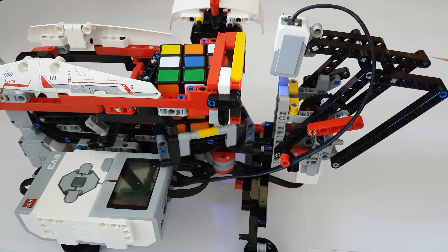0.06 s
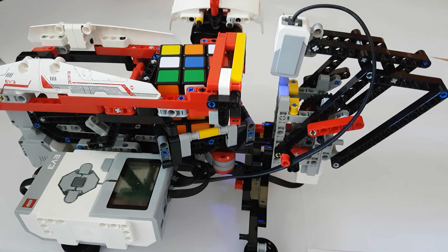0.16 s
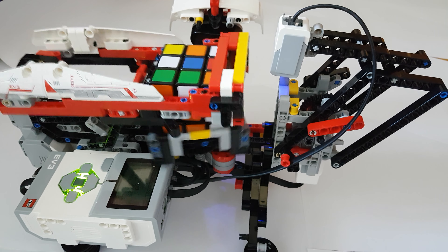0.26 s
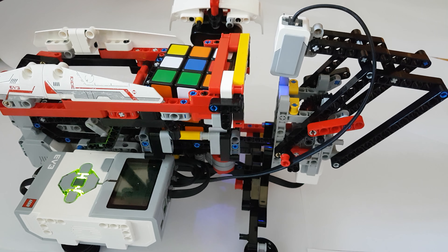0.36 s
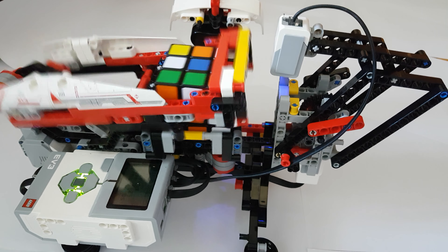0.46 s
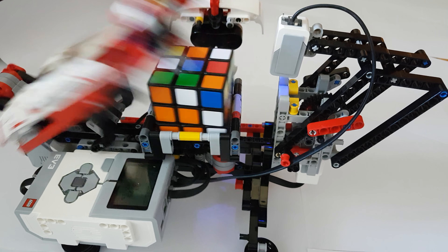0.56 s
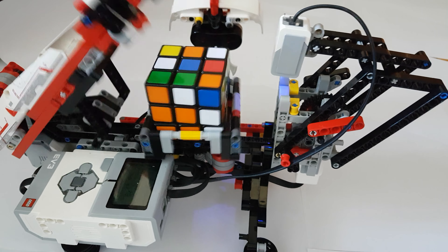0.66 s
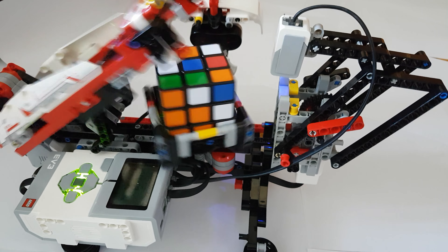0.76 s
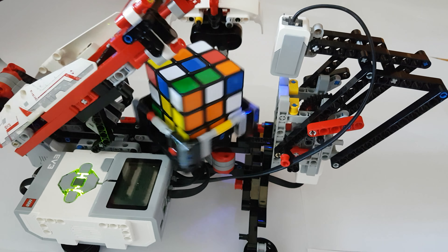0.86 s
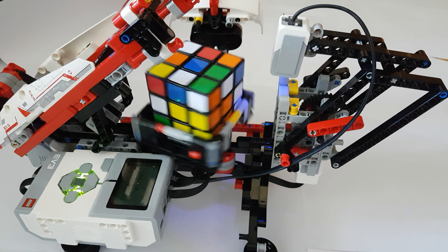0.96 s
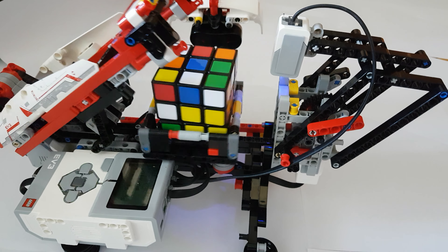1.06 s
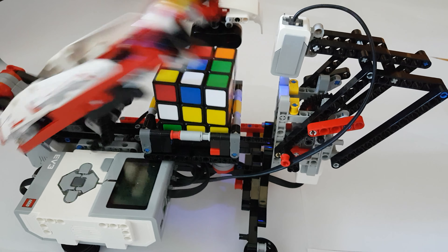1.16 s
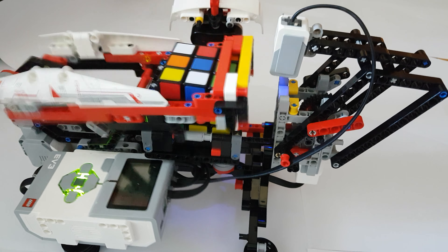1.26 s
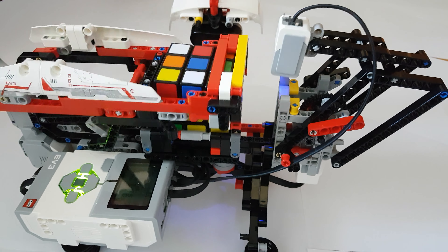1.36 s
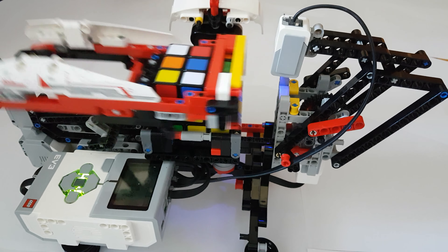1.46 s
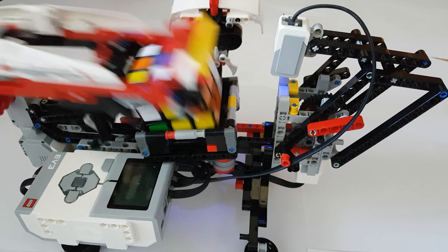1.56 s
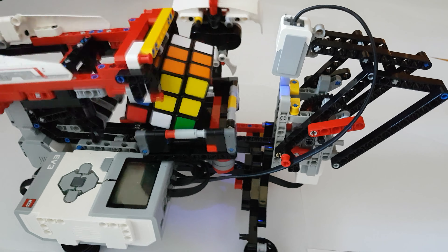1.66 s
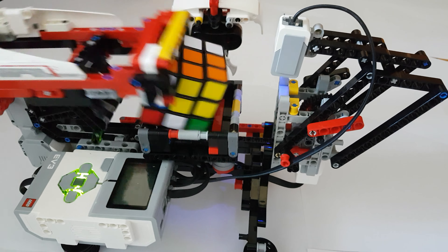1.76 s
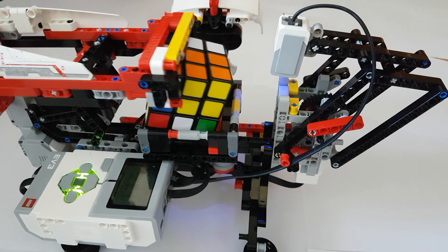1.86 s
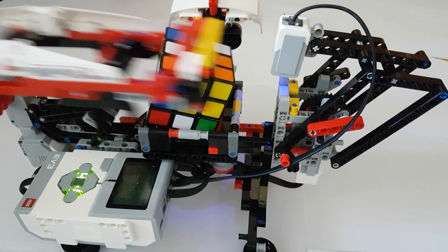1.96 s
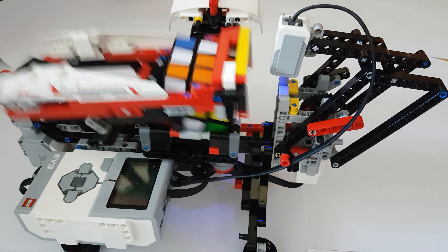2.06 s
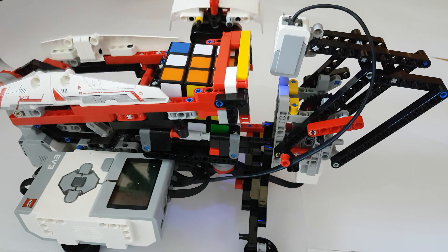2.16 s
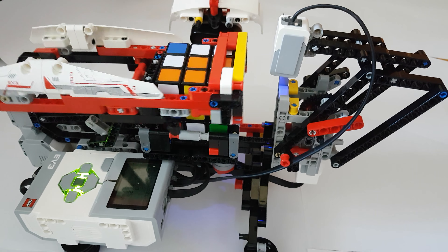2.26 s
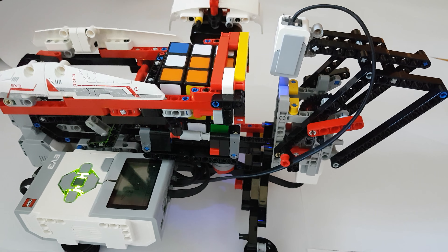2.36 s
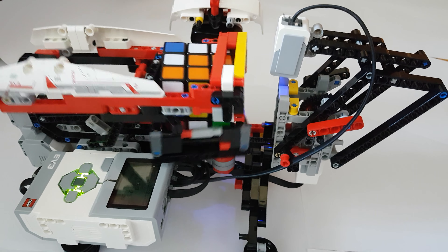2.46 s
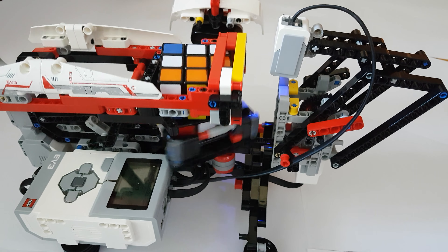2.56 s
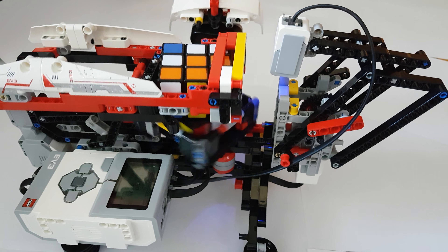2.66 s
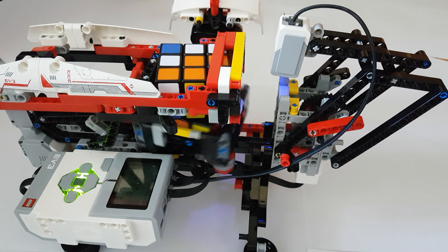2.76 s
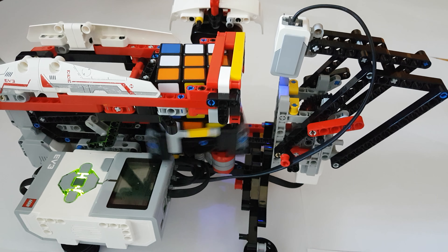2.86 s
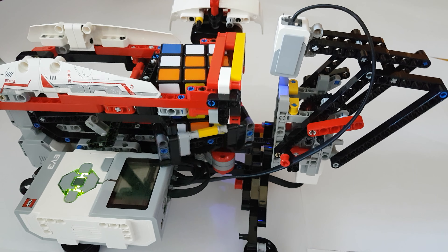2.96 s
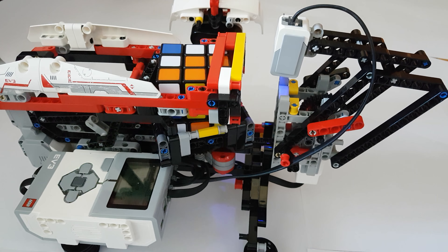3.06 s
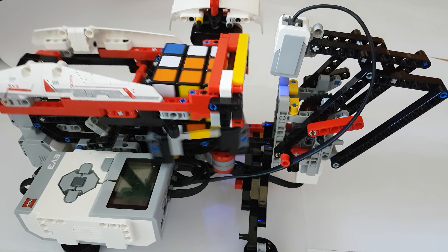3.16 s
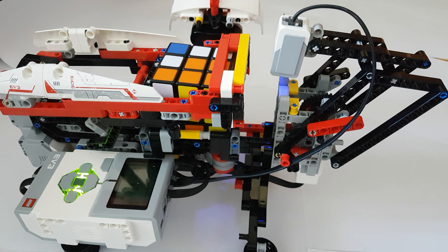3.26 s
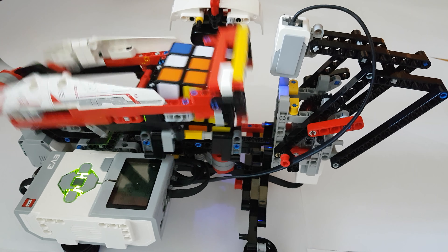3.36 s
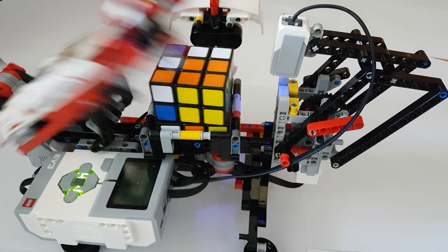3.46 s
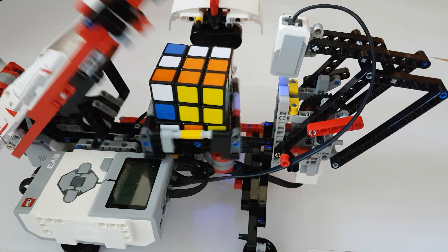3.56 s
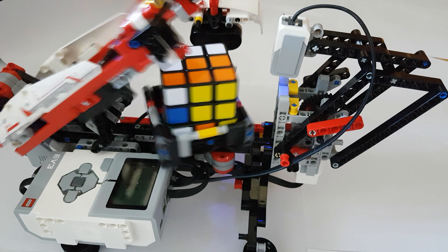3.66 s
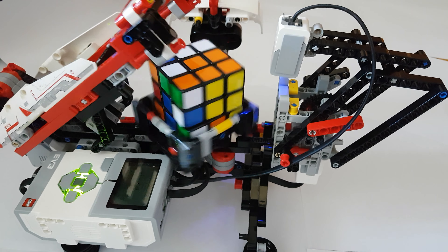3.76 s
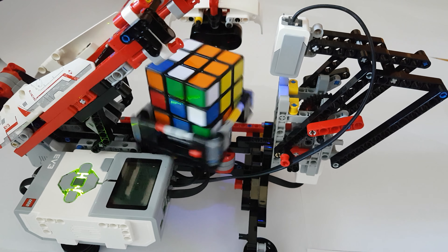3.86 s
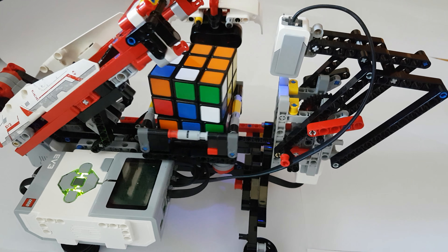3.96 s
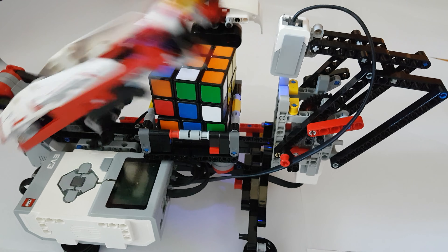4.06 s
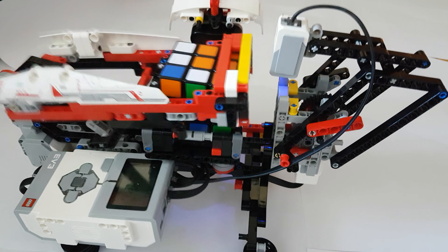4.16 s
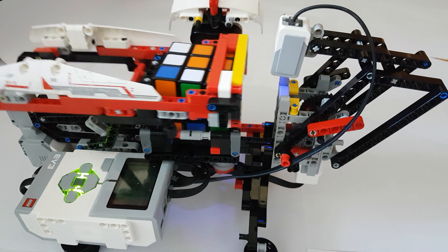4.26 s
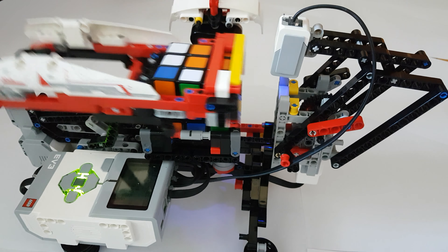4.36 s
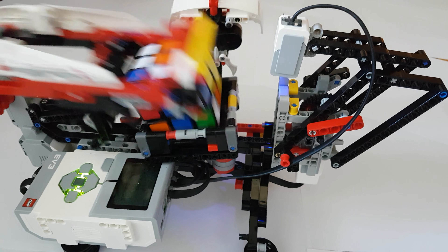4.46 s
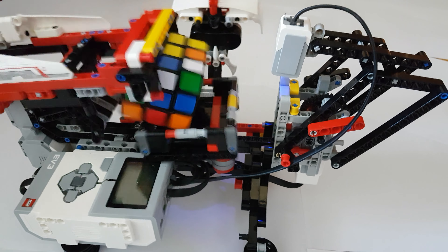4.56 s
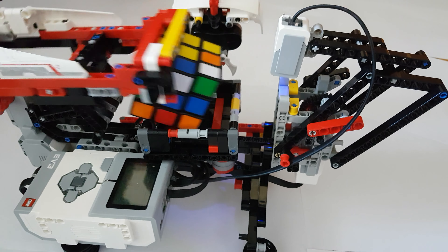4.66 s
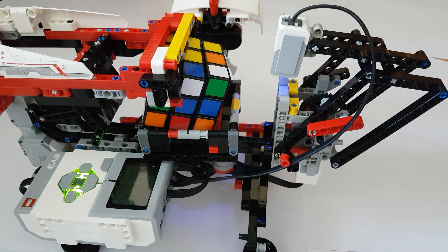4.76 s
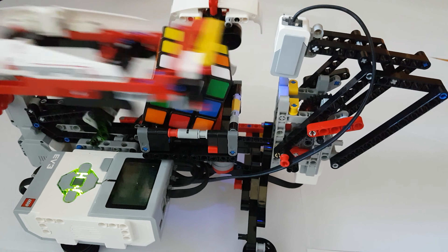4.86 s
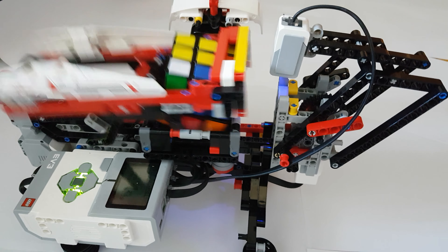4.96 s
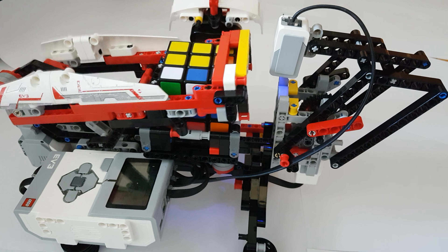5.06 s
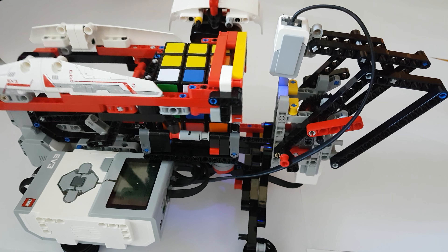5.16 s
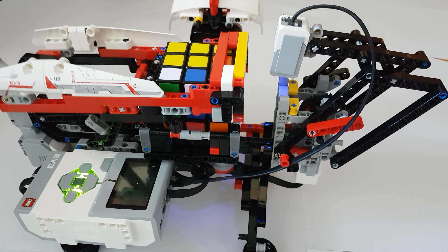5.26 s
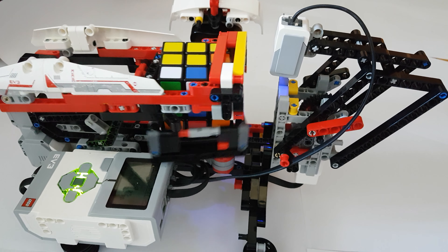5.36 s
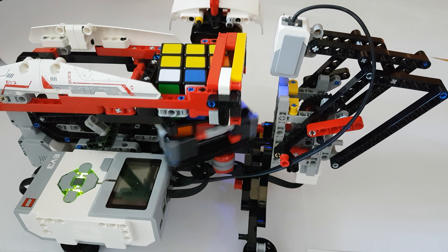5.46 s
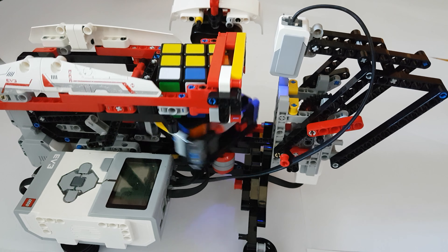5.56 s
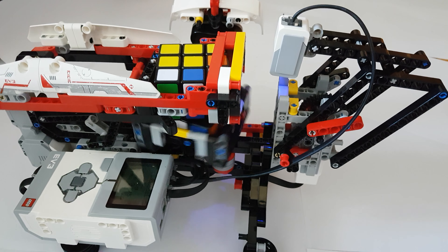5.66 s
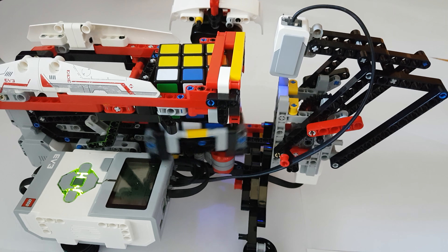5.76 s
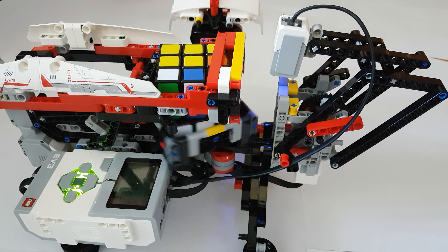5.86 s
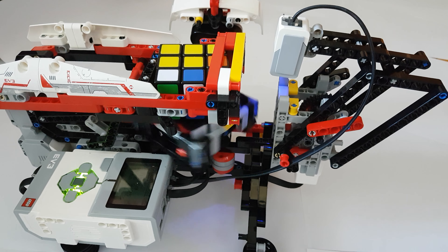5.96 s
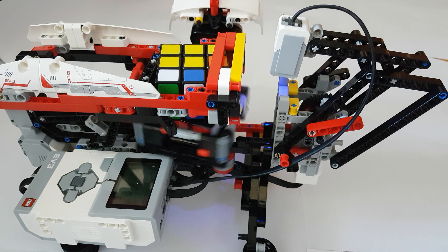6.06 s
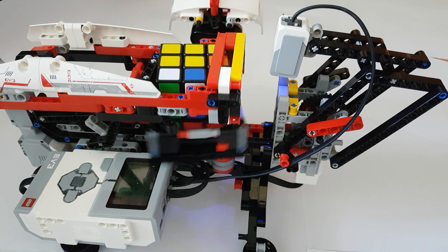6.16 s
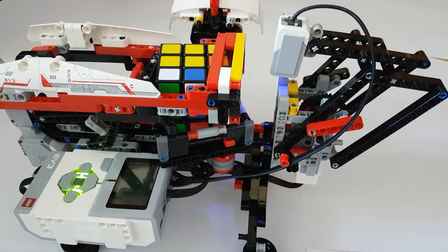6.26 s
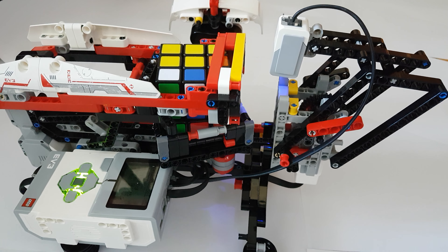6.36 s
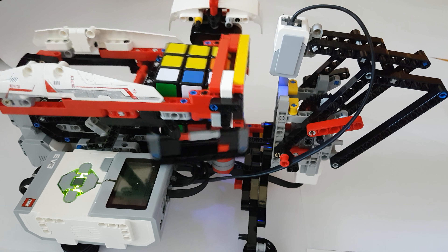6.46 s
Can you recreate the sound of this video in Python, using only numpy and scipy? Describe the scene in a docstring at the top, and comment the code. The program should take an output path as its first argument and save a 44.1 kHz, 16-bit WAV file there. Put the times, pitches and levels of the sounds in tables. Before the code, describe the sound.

Close stereo pickup in a small room: little electric motors buzz in quick start-and-stop bursts, gear teeth rattling and singing. Loose plastic knocks and crackly clacks cluster as the cube is caught, tipped and gripped, with light low thumps through the table. After a half-second twisting whine the same sequence returns, finishing with a nearly one-second whine and a brief blip over very faint room noise.

```python
"""A toy robot of plastic bricks turns a puzzle cube on a table in a small room, heard from close by.
The tray motor brakes from a twist and nudges; the arm lifts, the tray spins, the arm lands, tips the cube and grips it.
The tray twists a layer and nudges, the whole arm routine comes again, then a longer twist and a last nudge end it.
Gear teeth whine as sine lines and rattle as filtered noise; bursts of noise clack through the plastic
and thump in the frame, over faint rumble, hiss and a steady hum."""
import sys
import numpy as np
from scipy import signal
from scipy.fft import rfft, irfft, next_fast_len
from scipy.io import wavfile
from scipy.ndimage import map_coordinates

SR = 44100
rng = np.random.default_rng(int(sys.argv[2]) if len(sys.argv) > 2 else 0)


def int16_out(signal):
    """Quantize to a 16-bit WAV file."""
    q = np.round(np.clip(np.atleast_2d(signal).T, -1, 1) * 32767)
    wavfile.write(sys.argv[1], SR, q.astype(np.int16))


N = 287091

TEETH = 10  # on each motor's pinion
ROUTINE_S = 2.893  # the arm plays one routine twice, this far apart
# strokes of the arm: lift, come down, push over, settle, pull back, settle
# columns: start_s, later_on_repeat_s, driven_s, top_tooth_rate_hz, level_db
ARM_STROKES = [(.439, .003, .151, 760, -41.4), (1.155, 0, .133, 690, -40.7),
               (1.48, -.003, .172, 738, -41.7), (1.68, .055, .075, 401, -49.2),
               (1.912, .006, .187, 650, -42.2), (2.168, .028, .068, 400, -49)]
# colour of plastic contacts: pitch_hz, gain_db
PLASTIC_COLOUR = [(150, -24), (250, -20.5), (393, -20), (831, -11), (971, -10.5), (1260, -1), (2240, -10.5),
                  (3770, -2.5), (4260, -11), (7980, -11), (9170, -18.5), (12500, -12), (16000, -20)]


def tray(full_hz=930, brake_s=.103):
    """The tray motor: twisting a layer presses the teeth together, so they sing and the frame shakes less."""
    # start_s, driven_s, top_tooth_rate_hz, kind
    moves = [(-.4, .411, 916, "twist"), (.221, .1, 640, "nudge"), (.657, .38, 968, "spin"),
             (2.398, .517, 917, "twist"), (3.116, .114, 636, "nudge"), (3.564, .382, 989, "spin"),
             (5.306, .902, 932, "twist"), (6.414, .1, 640, "nudge")]
    # by kind of move: level_db, load (0 cube spins freely, 1 a layer is twisted)
    kinds = {"nudge": (-46.5, .24), "spin": (-43, .47), "twist": (-42, .76)}
    # by kind of move: level of the singing teeth at full speed, level_db
    whine_db = {"nudge": -48, "spin": -41.5, "twist": -34.2}
    # whine of the loaded and of the free gears: multiple_of_shaft_speed, level_db
    twist_orders = [(10, -22.5), (13, -29), (19, -22), (20, 5.5), (21, -8.5), (23, -16), (29, -7), (30, -5),
                    (39, -2), (40, -1), (41, -10)]
    free_orders = [(9, -10), (10, -10), (20, 1), (30, -2), (39, -1), (49, -8)]
    # colour of the gearbox: pitch_hz, gain_db
    tray_body = [(180, -56.5), (300, -25), (603, -26.5), (856, -12.5), (1040, -13), (1870, -4.5),
                 (2840, -7), (3290, -10.5), (3700, -3.5), (4300, -8.5), (6300, -14.5), (7950, -7.5),
                 (9240, -17.5), (12100, -13.5), (16000, -19.5)]
    # a long twist binds for a moment: time after its start, width, share of speed lost
    bind_after_s, bind_width_s, bind_loss = .64, .07, .02
    start_rattle_db = 9.5  # the cube rattles more while the tray gathers speed
    out = np.zeros((2, N))
    for start, drive_s, top_hz, kind in moves:
        db, load = kinds[kind]
        t, rise, fall = travel(start, drive_s, brake_s, spin_up=.074)
        binding = bind_loss * np.exp(-((t - start - bind_after_s) / bind_width_s) ** 2)
        tooth_hz = top_hz * rise * fall * (1 - binding)
        turns = shaft_turns(tooth_hz, waver=.004 - .0025 * load, judder=.012 - .006 * load)
        gain = (rise * fall) ** 0.8 * amp(db + 0.9 * wobble(20.4, len(t)))
        gears = gain * rattle(turns, tray_body, pressure=0.31 + 0.76 * load, repeat_db=3.5,
                              tick_db=0, throb=0.15, uneven_db=4.5)
        knock_db = -6.5 - 17.6 * load + start_rattle_db * np.sqrt(1 - rise)
        loose = jostle(gain * amp(knock_db), spiky_db=11)
        loose = loose + shudder(gain * amp(-8.5 - 13 * load))
        speed = np.minimum(tooth_hz / full_hz, 1)
        singing = amp(whine_db[kind]) * speed ** 3 * fall ** 2  # only near full speed and under drive
        orders = twist_orders if kind == "twist" else free_orders
        tone = singing * whine(turns, speed, orders, flutter_db=2.2)
        add(out, t[0], placed(amp(-1.0) * gears + loose, room_db=-6, left_db=1.46))
        add(out, t[0], placed(tone, room_db=-16, left_db=5.5, scatter_db=-12))
    return out


def arm(full_hz=760, brake_s=.125):
    """The arm motor: short, rough swings that shake the whole frame."""
    # whine of the gears: multiple_of_shaft_speed, level_db
    arm_orders = [(20, -9), (27, -4), (30, -1), (40, 0), (45, -10), (50, 0), (70, -5), (100, -11)]
    # colour of the gearbox: pitch_hz, gain_db
    arm_body = [(180, -37), (300, -26), (574, -18.5), (1190, -4), (1660, -7.5), (2070, -1.5), (2610, -7),
                (3700, -2), (4160, -8.5), (5250, -3.5), (6000, -11), (7200, -3), (8940, -16), (13500, -8),
                (16000, -19.5)]
    out = np.zeros((2, N))
    for start, _, drive_s, top_hz, db in twice(ARM_STROKES):
        t, rise, fall = travel(start, drive_s, brake_s, spin_up=.036)
        tooth_hz = top_hz * rise * fall
        turns = shaft_turns(tooth_hz, waver=.003, judder=.012)
        gain = rise ** 1.17 * fall ** 1.09 * amp(db + 0.87 * wobble(26.3, len(t)))
        gears = gain * rattle(turns, arm_body, pressure=0.55, repeat_db=0.5,
                              tick_db=-1.5, throb=0.16, uneven_db=5.5)
        loose = jostle(gain * amp(-23.5), spiky_db=13) + shudder(gain * amp(-12.5))
        speed = np.minimum(tooth_hz / full_hz, 1)
        singing = amp(db + 4.5) * speed ** 5 * fall ** 2
        tone = singing * whine(turns, speed, arm_orders, flutter_db=2.5)
        add(out, t[0], placed(amp(-3.0) * gears + loose, room_db=-3.5, left_db=4.5))
        add(out, t[0], placed(tone, room_db=-10, left_db=3, scatter_db=-6))
    return out


def travel(start, drive_s, brake_s, spin_up):
    """Times of one move, its exponential run-up and its even braking, both as shares of top speed."""
    stop = start + drive_s + brake_s
    t = np.arange(max(start, 0), stop, 1 / SR)
    rise = np.abs(1 - np.exp(-(t - start) / spin_up))
    fall = np.clip((stop - t) / brake_s, 0, 1)
    return t, rise, fall


def shaft_turns(tooth_hz, waver, judder):
    """Turns made by a motor shaft whose speed wavers with the play in the gears."""
    size = len(tooth_hz)
    play = 1 + waver * wobble(35, size) + judder * wobble(400, size)
    return np.cumsum(tooth_hz * play) / TEETH / SR


def whine(turns, speed, orders, flutter_db, throb=0.4):
    """Meshing teeth sing at multiples of the shaft speed, unsteady and throbbing once a turn."""
    lines = 0
    for k, db in orders:
        flutter = amp(db + flutter_db * wobble(45.04, len(turns)))
        sine = np.sin(2 * np.pi * (k * turns + rng.random()))
        lines = lines + speed ** (k / TEETH) * flutter * sine  # higher lines need more speed
    full_rms = np.sqrt(sum(amp(db) ** 2 for k, db in orders) / 2)
    return (1 + throb * np.cos(2 * np.pi * turns)) * lines / full_rms


def rattle(turns, body, pressure, repeat_db, tick_db, throb, uneven_db):
    """Teeth scrape and tick inside a shell that rings more under pressure; the treble has rms 1."""
    # ringing of the gearbox shells: centre_hz, width_hz, lift_db
    shell = [(1197, 73, 12.5), (2780, 220, 8.5), (3662, 160, 10), (7070, 110, 3)]
    size = len(turns)
    flaws = rng.standard_normal(512)
    # the same flaws pass on every turn
    repeating = np.interp(turns, np.arange(len(flaws)) / len(flaws), flaws, period=1)
    scrape = rng.standard_normal(size) * (1 + np.cos(2 * np.pi * TEETH * turns))
    ticks = np.diff(np.floor(TEETH * turns), prepend=0)  # one per tooth
    ticks = ticks * amp(uneven_db * rng.standard_normal(size)) * rng.choice([-1, 1], size)
    force = unit(scrape) + amp(repeat_db) * unit(repeating) + amp(tick_db) * unit(ticks)
    force = force * (1 + throb * np.cos(2 * np.pi * turns))  # the pinion runs slightly off centre

    def gearbox(hz):
        lift_db = sum(db / (1 + (2 * (hz - centre) / width) ** 2) for centre, width, db in shell)
        return causal(amp(along(body, hz) + pressure * lift_db))

    sound = filtered(force, gearbox)
    return sound / np.std(filtered(sound, lambda hz: hz > 4200))


def jostle(gain, spiky_db):
    """The cube and loose beams rattle in uneven little knocks, with the treble damped."""
    size = len(gain)
    knocks = rng.standard_normal(size) * amp(spiky_db * np.tanh(wobble(130.3, size)))
    dull = lambda hz: causal(amp(along(PLASTIC_COLOUR, hz)) / (1 + (hz / 2600) ** 2))
    return gain * unit(filtered(knocks, dull))


def shudder(gain, lumpy_db=4):
    """Moving parts shake the frame in uneven lumps."""
    lumps = amp(lumpy_db * wobble(21.0, len(gain)))
    return gain * unit(frame(rng.standard_normal(len(gain)) * lumps))


def clacks(crack_t60=0.027, chatter_t60=0.13, chatter_db=-16, spiky_db=5, graze_t60=0.041, graze_db=-10):
    """Plastic meets plastic: the parts graze, crack together, and the loose bricks chatter."""
    out = np.zeros((2, N))
    t = np.arange(-SR // 100, SR // 5) / SR  # seconds from the crack
    for s, db, hard_db in contacts() + tumbles():
        graze = amp(graze_db - 60 * np.abs(t) / graze_t60)
        crack = amp(-60 * np.abs(t) / crack_t60)
        loose = unit(amp(spiky_db * wobble(740, len(t))))
        chatter = loose * amp(chatter_db - 60 * np.abs(t) / chatter_t60)
        force = rng.standard_normal(len(t)) * np.where(t < 0, graze, crack + chatter)
        # (Hz, dB): harder contacts are brighter
        hardness = [(1500, 1.0 - 0.11 * hard_db), (3200, 0), (7000, hard_db - 5.5)]
        hit = filtered(force, lambda hz: causal(amp(along(PLASTIC_COLOUR, hz) + along(hardness, hz))))
        hit = amp(db - 10.0) * hit / np.std(hit[np.abs(t - .002) < .003])  # level set around the crack
        add(out, s + t[0], placed(hit, room_db=-4.0, left_db=1.5))
    return out


def contacts():
    """The routine's blows on both passes: (s, strength dB, hardness dB)."""
    # lift, tray catching the cube, arm landing, cube tipping, dropping back and being gripped
    # columns: start_s, later_on_repeat_s, strength_db, louder_on_repeat_db, hardness_db
    blows = [(.511, .006, -28, -3, 3), (.592, -.005, -25.5, -4.5, -5.5), (.766, -.001, -20.5, 3, 8),
             (1.205, -.005, -27.5, 0, -2), (1.267, -.007, -21, 4, 4.5), (1.297, -.023, -17.5, -2.5, -1),
             (1.304, .002, -13, 2, 3.5), (1.559, .013, -23.5, -0.5, -2.5), (1.704, .009, -19.5, -3, -3.5),
             (1.713, .015, -21.5, -6, 5.5), (2.03, .001, -26, 4, 1), (2.065, .006, -17.5, -2.5, -2),
             (2.135, .003, -21, 1.5, 0), (2.23, .008, -24.5, -1, 0)]
    return [(s, db + repeat * louder_db, hard_db) for s, repeat, db, louder_db, hard_db in twice(blows)]


def tumbles(per_s=28, strength_db=-31.5, spread_db=2.5, hardness_db=-6):
    """Small chance knocks of the cube wobbling as it goes over: (s, strength dB, hardness dB)."""
    # the cube tips, then drops back, within the routine: begin_s, end_s
    spans = [(1.68, 1.81), (2.01, 2.18)]
    slots = np.concatenate([np.arange(begin, end, 1 / per_s) for begin, end in spans])
    return [(s + rng.random() / per_s, strength_db + spread_db * rng.standard_normal(), hardness_db)
            for s in np.r_[slots, slots + ROUTINE_S]]


def thumps(push_t60=0.085, jolt_after_s=.02):
    """The weight of arm and cube lands on the frame at every blow and whenever the arm brakes."""
    thump_db, per_strength, per_hardness = -32.5, 0.38, 0.74  # dB, dB per dB, dB per dB
    jolt_db = 2  # over the level of the stroke
    out = np.zeros((2, N))
    t = np.arange(SR // 4) / SR
    blows = [(s, thump_db + per_strength * db + per_hardness * hard_db) for s, db, hard_db in contacts()]
    jolts = [(start + drive_s + jolt_after_s, db + jolt_db)
             for start, _, drive_s, _, db in twice(ARM_STROKES)]
    for s, db in blows + jolts:
        thud = frame(rng.standard_normal(len(t)) * amp(-60 * t / push_t60))
        add(out, s, placed(amp(db) * thud / np.abs(thud).max(), room_db=-6, left_db=0.5))
    return out


def frame(force):
    """The low resonances of the frame standing on the table."""
    # centre_hz, width_hz, level_db
    resonances = [(98, 21, -8), (149.3, 20.4, 1), (203.3, 33.3, -4), (244.5, 69, -9)]

    def ringing(f):
        total = 0
        for k, (c, w, db) in enumerate(resonances):
            total = total + (-1) ** k * amp(db) * 1j * f * w / (c * c - f * f + 1j * f * w)
        return total

    return filtered(force, ringing)


def twice(routine):
    """Rows of a routine on both passes: (s, 0 for the first pass or 1 for the repeat, other columns)."""
    return [(s + repeat * (ROUTINE_S + later), repeat, *rest)
            for repeat in range(2) for s, later, *rest in routine]


def room_tone(hum_hz=440, hum_db=-70):
    """Faint rumble and hiss from shaped noise, with one hum of steady pitch."""
    # colour of the quiet room: pitch_hz, gain_db
    quiet = [(22, -13), (45, -10), (62, -13.5), (100, -3), (200, -3.5), (350, -16.5), (800, -20.5),
             (2000, -18), (6000, -27), (16000, -47)]
    air = amp(-61) * unit(filtered(rng.standard_normal(N), lambda hz: amp(along(quiet, hz))))
    hum = amp(hum_db + 1.5 * wobble(11, N)) * np.sin(2 * np.pi * hum_hz * np.arange(N) / SR)
    return placed(air, room_db=-2, left_db=2.0)[:, :N] + hum


def placed(x, room_db, left_db, scatter_db=3, scatter_t60=0.021):
    """Sound reaches two microphone ports out of step: direct, scattered by the bricks, and by the room."""
    # difference between the ports: pitch_hz, side_over_mid_db
    port_width = [(120, -17.5), (300, -5.5), (1300, -6.5), (2800, -1), (5000, 0)]
    # decay of the room: pitch_hz, t60_s
    room_decay = [(150, 0.41), (2000, 0.21), (12000, 0.22)]
    t = np.arange(SR // 3) / SR
    scatter = rng.standard_normal(len(t)) * amp(-60 * t / scatter_t60)
    scatter = (t == 0) + amp(scatter_db) * scatter / np.linalg.norm(scatter)
    direct = np.array([t == 0, scatter / np.linalg.norm(scatter)])  # mid clean, side scattered
    paths = direct + amp(room_db) * tail(room_decay)[:, :len(t)]
    mid, side = signal.fftconvolve(x[None], paths, axes=1)
    side = filtered(side, lambda hz: -1j * amp(along(port_width, hz)))  # a quarter cycle late
    return np.array([mid + side, mid - side]) * amp([[left_db / 2], [-left_db / 2]])


def tail(t60s):
    """Two unrelated echo trains, the first of energy 1; each frequency dies at its own speed."""
    hz, t, z = signal.stft(rng.standard_normal((2, SR // 3)), SR, nperseg=256)
    echoes = signal.istft(z * amp(-60 * t / along(t60s, hz)[:, None]), SR, nperseg=256)[1]
    return echoes / np.linalg.norm(echoes[0])


def amp(db):
    """Decibels to gain."""
    return 10 ** (np.asarray(db) / 20)


def unit(x):
    """Scaled to rms 1."""
    return x / np.sqrt(np.mean(x ** 2) + 1e-20)


def along(points, hz):
    """(Hz, value) points joined on a log axis."""
    f, v = np.transpose(points)
    return np.interp(np.log(hz + 1), np.log(f + 1), v)


def wobble(rate, size):
    """A smooth random curve, rate knots a second."""
    knots = rng.standard_normal(int(size * rate / SR) + 4)
    return map_coordinates(knots, [np.arange(size) * rate / SR])


def filtered(x, response):
    """x times a response of frequency."""
    size = x.shape[-1]
    m = next_fast_len(size + SR // 4)
    return irfft(rfft(x, m) * response(np.fft.rfftfreq(m, 1 / SR)), m)[..., :size]


def causal(gain):
    """The minimum-phase response with this gain, which rings only after its cause."""
    cepstrum = irfft(np.log(np.maximum(gain, 1e-6)))
    half = len(cepstrum) // 2
    return np.exp(rfft(np.r_[cepstrum[0], 2 * cepstrum[1:half], np.zeros(half)]))


def add(track, s, x):
    """Mix x into the track from time s."""
    part = track[..., max(round(s * SR), 0):][..., :x.shape[-1]]
    part += x[..., :part.shape[-1]]


def scene():
    """Both motors, their knocks and the room."""
    return tray() + arm() + clacks() + thumps() + room_tone()


def record(dry, top_hz=15950):
    """Nothing above the band limit is kept."""
    return filtered(dry, lambda hz: hz < top_hz)


dry = scene()
out = record(dry)
int16_out(out)
```